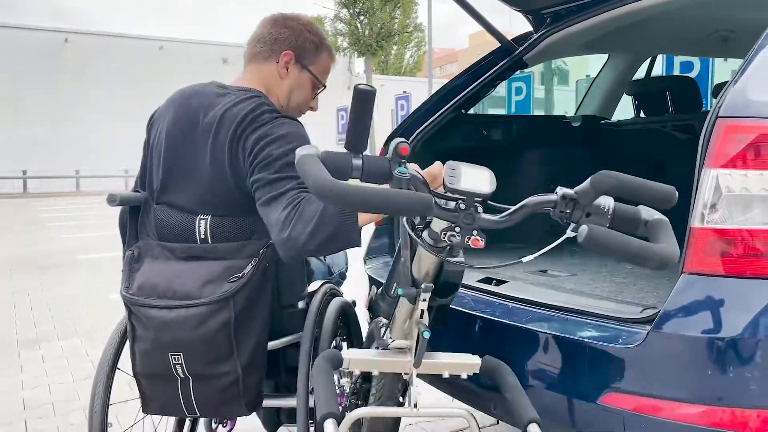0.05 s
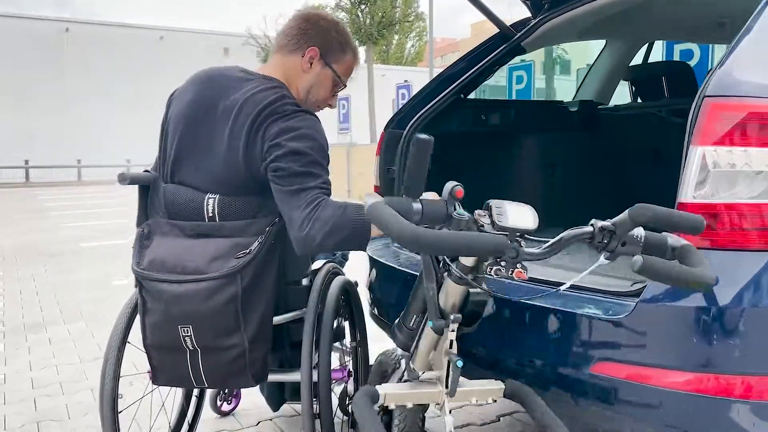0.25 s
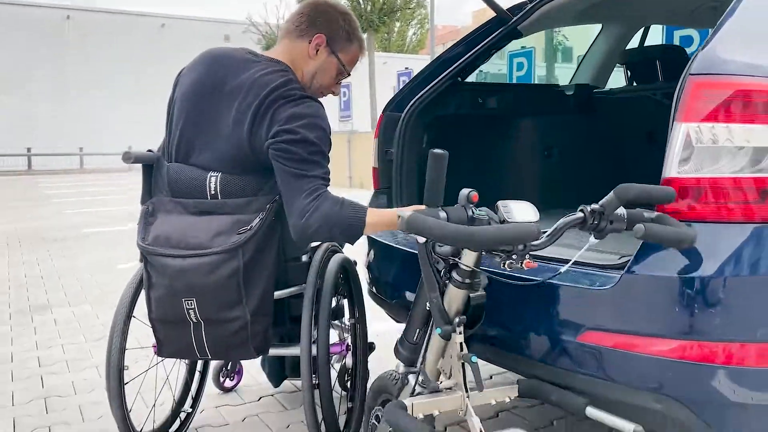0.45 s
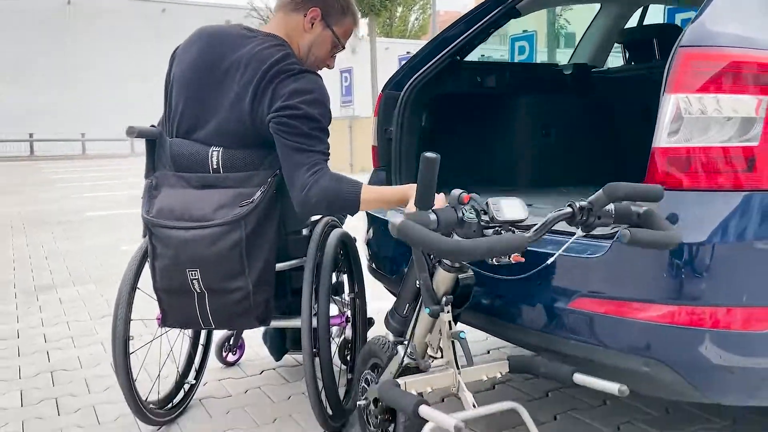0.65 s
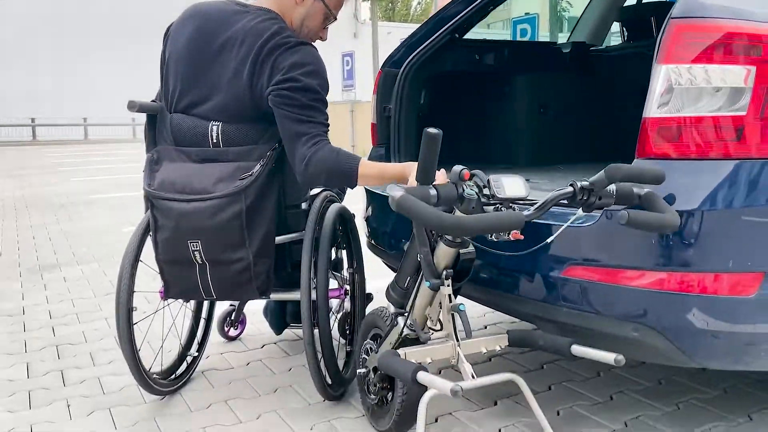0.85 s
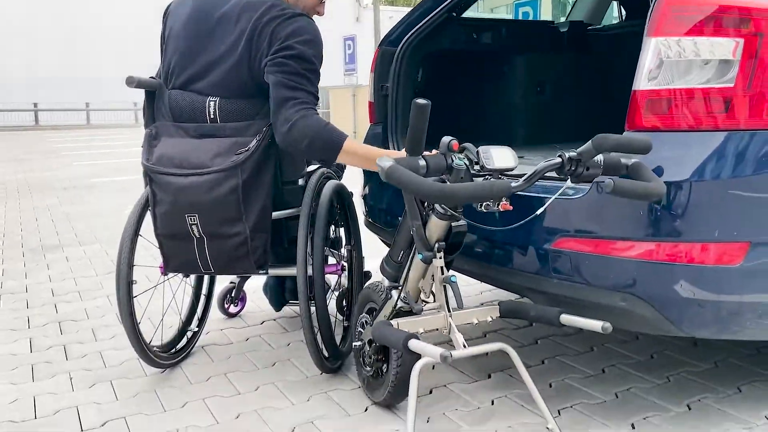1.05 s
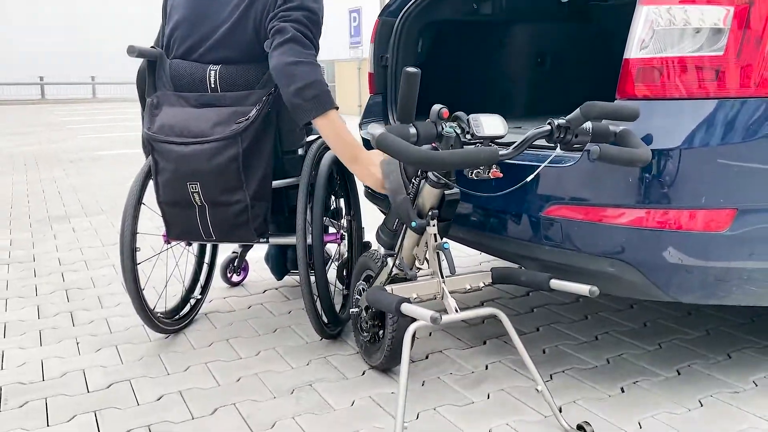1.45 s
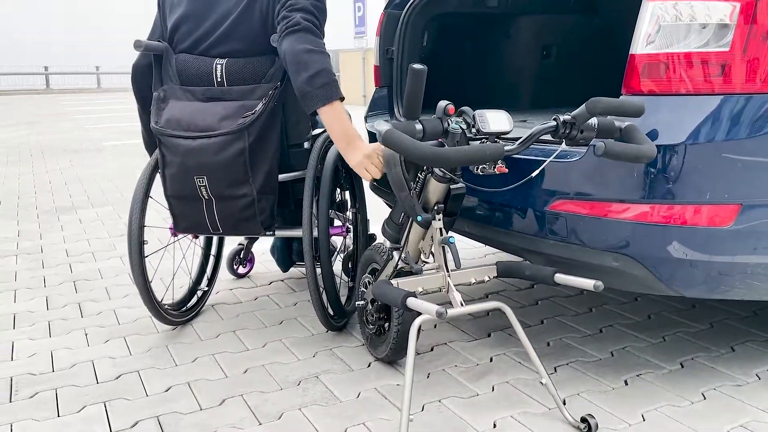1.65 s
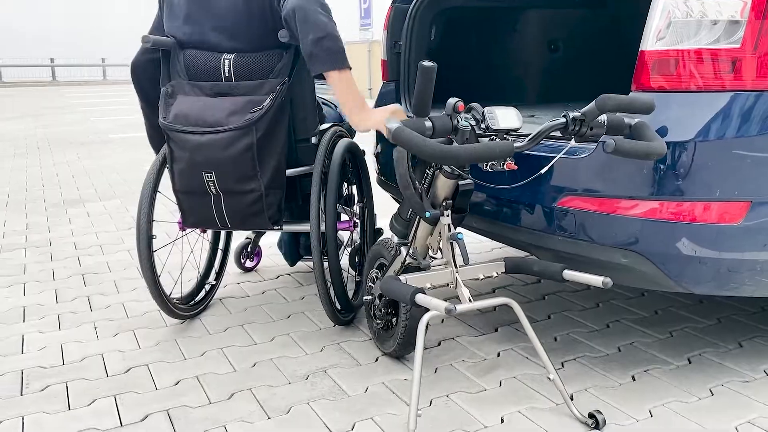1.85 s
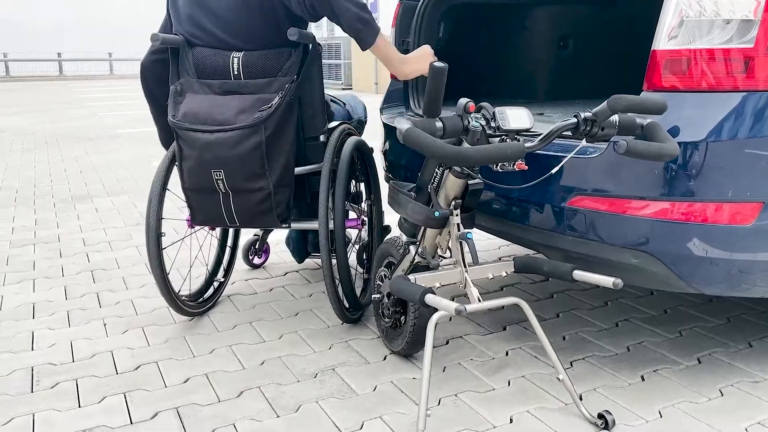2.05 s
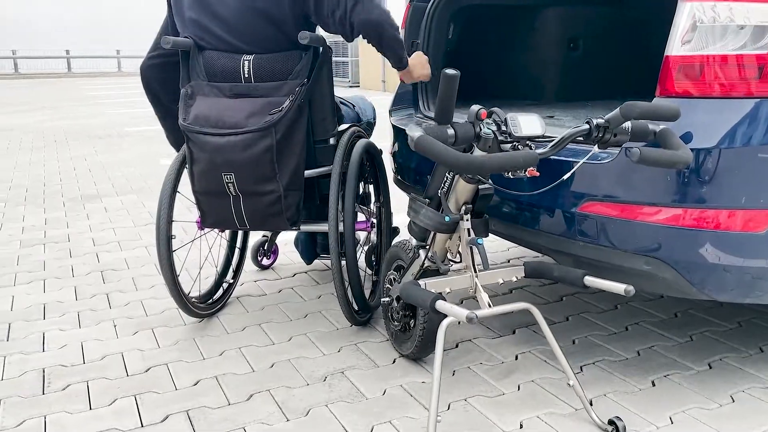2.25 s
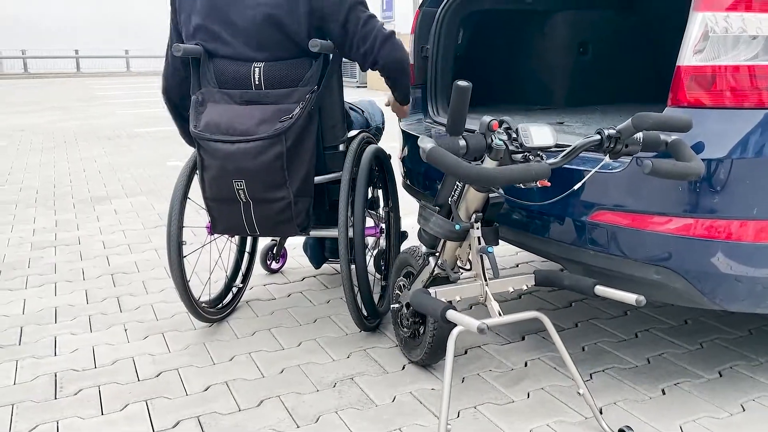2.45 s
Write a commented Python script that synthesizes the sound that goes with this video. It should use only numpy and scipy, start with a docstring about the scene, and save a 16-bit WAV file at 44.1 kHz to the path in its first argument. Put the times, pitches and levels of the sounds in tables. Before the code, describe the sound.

A sharp metal clatter as equipment is set down on paving, over low wind.

```python
"""A sharp metal clatter breaks through low wind as a wheelchair drive unit is set down in a car park.
Impacts of its stand on the paving excite the damped modes of tubes and loose parts; the tyre lands with
a hollow knock, the stand rocks onto its other leg and a catch snaps. Afterwards sleeves rustle by
friction and fittings tick. Faint reflections follow these near sounds, while gusts buffet the
microphone and distant traffic gives a steady wash."""
import sys
import numpy as np
from scipy import signal
from scipy.fft import rfft, irfft
from scipy.io import wavfile

SR = 44100
rng = np.random.default_rng(int(sys.argv[2]) if len(sys.argv) > 2 else 0)


def materialize(psi):
    """Save the field psi as 16-bit PCM at rate SR to the path in sys.argv[1].

    A 1-D psi becomes a single channel; in a 2-D psi each row is a channel.
    """
    bounded = np.clip(np.atleast_2d(psi).T, -1, 1)
    quanta = np.round(bounded * 32767).astype(np.int16)
    wavfile.write(sys.argv[1], SR, quanta)


N = 110250


def frame():
    """Impact excitation: blows on the paving ring the frame; in a hard clank one mode stands out."""
    # Each row: start in seconds, then level, bass shelf and treble shelf in dB.
    blows = [(0.3761, -5.5, -9.5, 3), (0.3831, -7.5, 4, 6), (0.387, -12, -1, 0.5), (0.3994, -9, 3.5, -1),
             (0.4039, -11.5, 11, 7), (0.4113, -13.5, -7, 10), (0.4176, -9, 1, -11.5),
             (0.4258, -19, -32.5, 4), (0.4416, -15, -9.5, 5), (0.4614, -10, -13.5, -1),
             (0.4694, -14, 5, -8.5), (.4825, -25.5, -4, 1), (0.4969, -22.5, 1.5, -1.5),
             (0.5764, -33, 7, -13), (0.641, -28.5, 3, -7.5)]
    # Each row: a tube mode's frequency in Hz, level in dB, t60 in seconds.
    tubes = [(325, -3, .13), (1151, -1, .12), (1227, 3, .14), (1802, -4, .11), (2140, -8, .27),
             (2272, 0, .16), (2536, -3, .15), (2805, 2.5, .125), (3130, -2, .12), (3278, -3, .12),
             (4110, -3, .09), (4527, -7, .16), (4850, -8, .13), (5470, -15, .15), (7145, -14, .18)]
    # Each row: start in seconds, level in dB, pitch in Hz, t60 in seconds.
    clanks = [(.3768, 2.5, 2820, 0.0076), (.377, -12.5, 1803, 0.041), (.4155, -10.5, 1222, 0.079),
              (.4608, -10.5, 2832, .025), (.4685, -15.5, 2272, 0.086), (.5759, -30.5, 3320, 0.077),
              (.5762, -39, 4520, 0.086), (.647, -33, 1215, 0.14)]
    crash = struck(blows, tubes, modes_db=-17.5, parts_db=-5, rise_s=0.00019)
    return crash + damped_tones(clanks, rise_s=0.0002)


def rocking_leg():
    """Rebound: the stand rocks onto its other leg, which has natural frequencies of its own."""
    # Each row: start in seconds, level in dB.
    rebounds = [(0.7111, -19.5), (0.7252, -21.5), (0.7476, -19.5), (0.7531, -18.5), (.7607, -29),
                (0.928, -36.5)]
    # Each row: a leg mode's frequency in Hz, level in dB.
    leg = [(754, -7), (1248, 4), (1739, -1), (2159, 2), (2536, -2), (2810, -3), (3085, -4), (3381, -1),
           (4414, -1), (4880, -6)]
    treble_db, t60_s = -6.5, 0.08
    blows = [(start, db, 0, treble_db) for start, db in rebounds]
    modes = [(hz, db, t60_s) for hz, db in leg]
    return struck(blows, modes, modes_db=-14.5, parts_db=-7.5, rise_s=0.00094)


def struck(blows, modes, modes_db, parts_db, rise_s):
    """Modal superposition: each blow cracks on stone and rings the given modes and many small parts."""
    # Spectrum of a blow. Each row: frequency in Hz, relative level in dB.
    colour = [(120, -2), (300, -4), (720, -10), (1150, 0), (1420, -3), (1800, -2), (2900, 0), (4700, -5),
              (6200, -15), (8800, -12.5), (13000, -19.5), (16000, -30)]
    out, t = np.zeros((2, N)), np.arange(SR // 2) / SR
    count = 240
    part_hz = 150 + 15500 * ((np.arange(count) + rng.random(count)) / count) ** 1.7
    part_gain = shape(part_hz, colour) * np.sqrt(np.gradient(part_hz))  # sparser modes weigh more
    part_gain *= undb(parts_db) / np.sqrt(np.sum(part_gain ** 2) / 2)
    part_t60 = 0.09 * (part_hz / 2000) ** -0.21  # higher modes die sooner
    mode_hz, mode_db, mode_t60 = np.array(modes).T
    hz, t60 = np.r_[part_hz, mode_hz], np.r_[part_t60, mode_t60]
    phase = 2 * np.pi * np.outer(hz, t)
    decay = fade(t, t60[:, None])
    sine, cosine = np.sin(phase) * decay, np.cos(phase) * decay
    for start, db, bass_db, treble_db in blows:
        gain = np.r_[part_gain * contact_coupling(part_hz), undb(modes_db + mode_db)]
        gain *= shelves(hz, bass_db, treble_db)
        push = spread(gain * random_phases(len(hz)), width=0.3)
        ring = push.real @ sine + push.imag @ cosine
        crack = noise(colour, 0.25, bass_db, treble_db, size=len(t)) * fade(t, t60=0.01) * undb(-6)
        add(out, start, undb(db) * (ring + crack) * rise(t, rise_s))
    return out


def contact_coupling(hz):
    """Modal coupling: each point of contact favours its own random groups of modes."""
    knots_hz = np.arange(0, SR, 220)
    gain = undb(5 * np.clip(rng.standard_normal(len(knots_hz)), -2, 2))
    return np.interp(hz, knots_hz, gain / rms(gain))


def shelves(hz, bass_db, treble_db):
    """Excitation spectrum: where and how hard a part is struck sets its bass and treble gain."""
    bass = 1 / (1 + (hz / 1400) ** 6)
    treble = 1 - 1 / (1 + (hz / 6000) ** 6)
    return undb(bass_db * bass + treble_db * treble)


def tyre():
    """Damped resonance: the tyre lands with a hollow knock and a dull thud."""
    # Each row: start in seconds, level in dB, pitch in Hz, t60 in seconds.
    bumps = [(.6027, -4.5, 560, .025), (.609, -15, 260, .05), (.611, -22, 175, .09), (.6135, -26, 610, .09),
             (.6175, -18, 370, .06)]
    # Spectrum of the thud. Each row: frequency in Hz, relative level in dB.
    colour = [(100, -45.5), (330, -3), (620, -5), (900, -19), (2000, -25), (8000, -53.5)]
    t, rise_s = np.arange(SR // 2) / SR, 0.0012
    out = damped_tones(bumps, rise_s)
    thud = noise(colour, width=0.4, size=len(t)) * fade(t, t60=0.1) * rise(t, rise_s)
    add(out, bumps[0][0], undb(-18.5) * thud)
    return out


def catch():
    """Impulsive excitation: the catch snaps in two broadband bursts, heard as one."""
    # Each row: start in seconds, level in dB.
    snaps = [(0.852, -19.5), (0.8537, -28.5)]
    # Spectrum of a snap. Each row: frequency in Hz, relative level in dB.
    colour = [(200, -4), (1000, 3), (1950, 5.5), (2600, -5), (3900, 0.5), (5500, -16), (7800, -4.5),
              (13000, -10.5), (16000, -20)]
    return bursts(snaps, colour, width=0.61, t60=0.023)


def fittings():
    """Free vibration: loose fittings tick with a brief pitch, and one thin part rings on faintly."""
    # Each row: start in seconds, level in dB, pitch in Hz.
    ticks = [(1.3418, -40, 1900), (1.8544, -43.5, 2160), (1.8983, -44.5, 2180), (2.1784, -45.5, 2650)]
    # Spectrum of a tick's noise. Each row: frequency in Hz, relative level in dB.
    colour = [(300, -20.5), (2300, 2.5), (7000, -16), (16000, -17)]
    out, t = np.zeros((2, N)), np.arange(SR // 2) / SR
    for start, db, hz in ticks:
        ring = undb(1.5) * np.sin(2 * np.pi * hz * t)
        contact = noise(colour, width=0.62, size=len(t))
        add(out, start, undb(db) * (contact + ring) * fade(t, t60=0.03))
    ping = np.sin(2 * np.pi * 4126 * t) * fade(t, t60=0.87)
    add(out, start=2.274, sound=undb(-59.5) * ping)
    return out


def grip():
    """Contact transients: handling makes dry, unpitched clicks."""
    # Each row: start in seconds, level in dB.
    clicks = [(0.307, -42.5), (0.353, -39), (0.9361, -40), (0.993, -46), (1.2555, -40)]
    # Spectrum of a click. Each row: frequency in Hz, relative level in dB.
    colour = [(500, 2), (4000, -1), (8000, -4), (14000, -2.5)]
    return bursts(clicks, colour, width=0.4, t60=0.03)


def sleeves():
    """Friction noise: cloth slides in fine, uneven grains."""
    # Each row: time in seconds, rustle level in dB.
    rustle = [(0, -52.5), (.36, -58.5), (1.08, -64.5), (1.25, -52), (1.335, -47.5), (1.38, -56),
              (1.5, -59.5), (1.66, -53), (1.74, -61), (2.05, -67.5), (2.11, -50), (2.32, -75)]
    # Spectrum of the cloth. Each row: frequency in Hz, relative level in dB.
    colour = [(400, -40), (2500, 6.5), (5000, -2.5), (8500, -0.5), (13500, 0), (16000, -8)]
    t, grain_samples = np.arange(N) / SR, 30
    grains = np.exp(0.45 * rng.standard_normal(N // grain_samples + 1))
    flutter_db = 3 * np.interp(t, np.linspace(0, N / SR, 200), rng.standard_normal(200))
    rub = np.repeat(grains, grain_samples)[:N] * undb(flutter_db)
    level = undb(np.interp(t, *np.array(rustle).T))
    return noise(colour, width=0.34) * rub / rms(rub) * level


def wind():
    """Turbulent pressure: gusts rumble and flutter on the microphone, with a few low buffets."""
    # Each row: time in seconds, rumble level in dB, flutter level in dB.
    gusts = [(0, -38, -46.5), (.33, -31, -48.5), (.54, -36, -42.5), (.66, -33.5, -38.5), (.84, -36, -52.5),
             (.95, -23, -42), (1.052, -31.5, -40), (1.161, -23.5, -30), (1.29, -31, -43), (1.53, -30, -43),
             (2, -24.5, -33.5), (2.28, -33, -41), (2.46, -42, -45)]
    # Spectra of the two bands. Each row: frequency in Hz, relative level in dB.
    rumble_colour = [(28, -16.5), (48, 1), (64, 5.5), (140, -10.5), (400, -82.5)]
    flutter_colour = [(60, -8), (170, 6), (240, -7.5), (330, -15), (600, -74)]
    # Each row: start in seconds, level in dB, pitch in Hz, t60 in seconds.
    buffets = [(.877, -14.5, 144, 0.045), (.923, -7, 65, 0.017), (1.147, -23, 149, 0.05),
               (1.997, -6.5, 77, 0.08)]
    t = np.arange(N) / SR
    when, rumble_db, flutter_db = np.array(gusts).T
    rumble = noise(rumble_colour, width=0.26) * undb(2 + np.interp(t, when, rumble_db))
    flutter = noise(flutter_colour, width=0.26) * undb(np.interp(t, when, flutter_db))
    return rumble + flutter + damped_tones(buffets, rise_s=0.0012)


def traffic():
    """Diffuse sound: distant traffic is a steady, wide wash, slightly delayed on the right."""
    # Spectrum of the wash. Each row: frequency in Hz, relative level in dB.
    colour = [(150, -8.5), (300, -1), (560, -10), (2800, -27.5), (4500, -35.5), (15000, -69)]
    lag_s = 0.00041
    left, right = noise(colour, width=0.97) * undb(-46)
    return np.array([left, np.roll(right, int(lag_s * SR))])


def reflections(x):
    """Reverberation: the car, the paving and a far wall add a thin, dull tail."""
    # Spectrum of the tail. Each row: frequency in Hz, relative level in dB.
    colour = [(100, -2.5), (1000, 1.5), (7000, -0.5), (16000, -30.5)]
    t = np.arange(SR) / SR
    tail = noise(colour, width=0.91, size=SR) * fade(t, t60=0.25) * rise(t, 0.016)
    tail /= np.sqrt(np.sum(tail ** 2) / 2)
    return x + undb(-19) * signal.fftconvolve(x, tail, axes=1)[:, :N]


def microphone_ports(x):
    """Directional cues: near sounds reach two ports with level and phase that vary with frequency."""
    # Each row: frequency in Hz, left over right in dB, left phase lead in radians.
    ports = [(200, -0.5, -0.66), (576, -2.5, 0.96), (1250, 0.5, -0.3), (2300, -2.5, -0.53),
             (4200, 3.5, 1.67), (5320, 2, -1.35), (9320, -0.5, -3), (13060, 0, -7)]
    port_hz, db, lead = np.array(ports).T
    hz = np.fft.rfftfreq(N, 1 / SR)
    half_gain = undb(np.interp(hz, port_hz, db) / 2)
    left = half_gain * np.exp(1j * np.interp(hz, port_hz, lead))
    return irfft(rfft(x) * np.array([left, 1 / half_gain]), N)


def damped_tones(rows, rise_s):
    """Damped oscillators: each push starts one decaying sine."""
    out, t = np.zeros((2, N)), np.arange(SR // 2) / SR
    for start, db, hz, t60 in rows:
        add(out, start, undb(db) * np.sin(2 * np.pi * hz * t) * fade(t, t60) * rise(t, rise_s))
    return out


def bursts(rows, colour, width, t60):
    """Broadband transients: each contact starts a decaying noise."""
    out, t = np.zeros((2, N)), np.arange(SR // 2) / SR
    for start, db in rows:
        add(out, start, undb(db) * noise(colour, width, size=len(t)) * fade(t, t60))
    return out


def noise(colour, width, bass_db=0, treble_db=0, size=N):
    """Random-phase synthesis: stereo noise of a given spectrum, near unit rms before the shelves."""
    hz = np.fft.rfftfreq(size, 1 / SR)
    gain = shape(hz, colour)
    gain = gain / rms(gain) * shelves(hz, bass_db, treble_db)
    pair = irfft(gain * random_phases(len(hz)), size) * np.sqrt(size)
    return spread(pair, width)


def random_phases(count):
    """Incoherence: two independent rows of unit phasors."""
    return np.exp(2j * np.pi * rng.random((2, count)))


def spread(pair, width):
    """Mid-side stereo: left and right from a shared and an opposed signal."""
    mid, side = pair
    return np.array([mid + width * side, mid - width * side])


def shape(hz, colour):
    """Spectral envelope: gain between (Hz, dB) points on a logarithmic frequency axis."""
    knots_hz, db = np.array(colour).T
    return undb(np.interp(np.log(hz + 1), np.log(knots_hz), db))


def rise(t, rise_s):
    """Exponential onset with time constant rise_s."""
    return 1 - np.exp(-t / rise_s)


def fade(t, t60):
    """Free decay: 60 dB down after t60 seconds."""
    return np.exp(-np.log(1000) * t / t60)


def undb(db):
    """Decibels to amplitude ratio."""
    return 10 ** (np.asarray(db) / 20)


def rms(x):
    """Root-mean-square amplitude."""
    return np.sqrt(np.mean(x ** 2))


def add(out, start, sound):
    """Superposition: mix a sound in at a start time in seconds."""
    i = int(start * SR)
    out[:, i:i + sound.shape[-1]] += sound[..., :N - i]


def scene():
    """Superposition: the near sounds and their reflections add to wind and traffic."""
    near = frame() + rocking_leg() + tyre() + catch() + fittings() + grip() + sleeves()
    return reflections(microphone_ports(near)) + wind() + traffic()


def record(dry):
    """Clipping and band limiting: peaks are flattened at 0.9 and the treble ends at 15.7 kHz."""
    lowpass = signal.ellip(10, 0.2, 80, 15700, fs=SR, output="sos")
    return signal.sosfilt(lowpass, np.clip(dry, -0.9, 0.9))


dry = scene()
out = record(dry)
materialize(out)
```